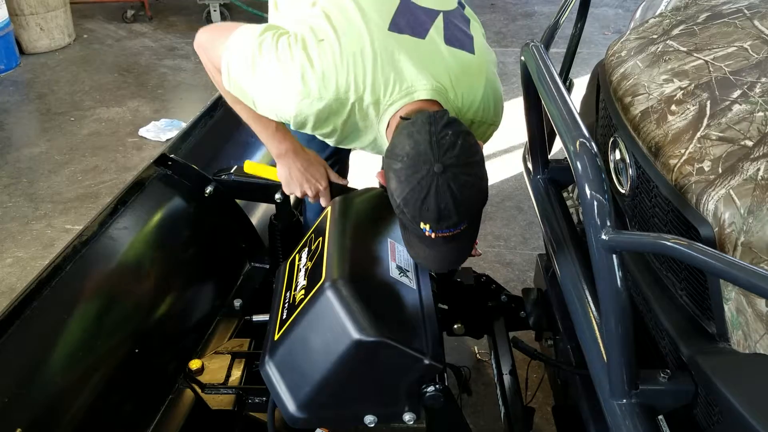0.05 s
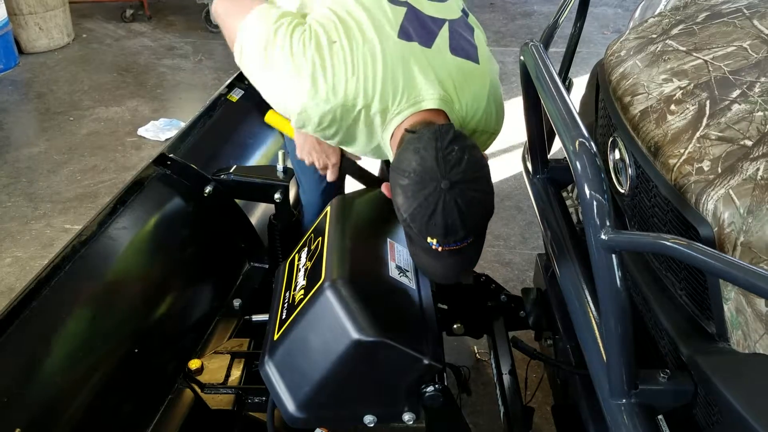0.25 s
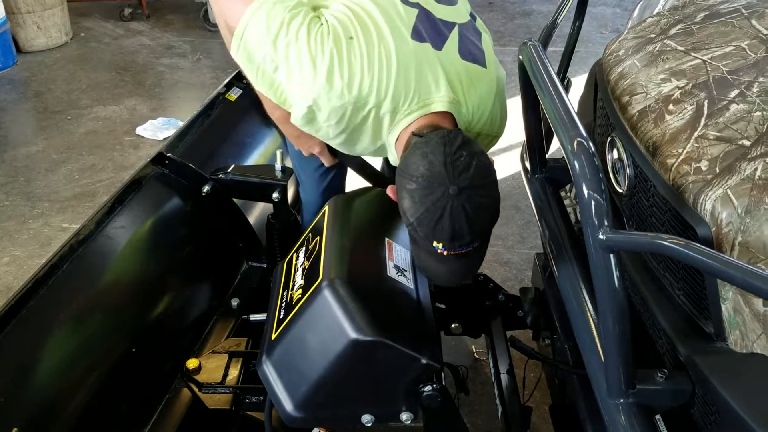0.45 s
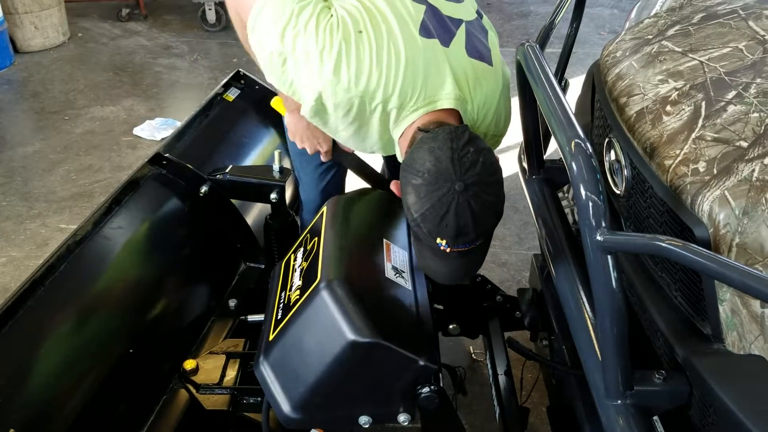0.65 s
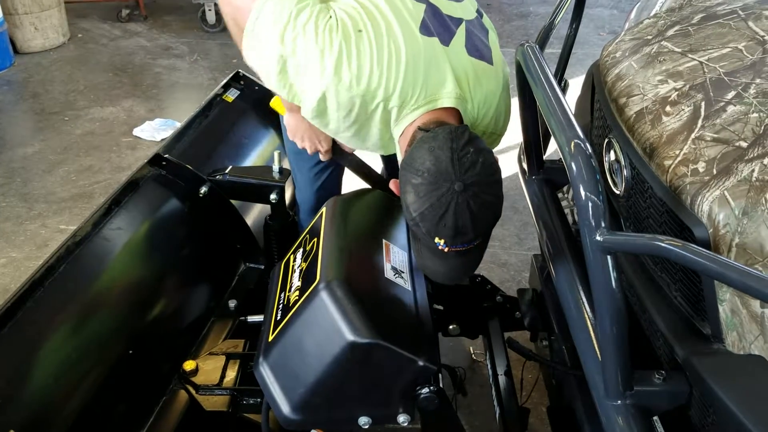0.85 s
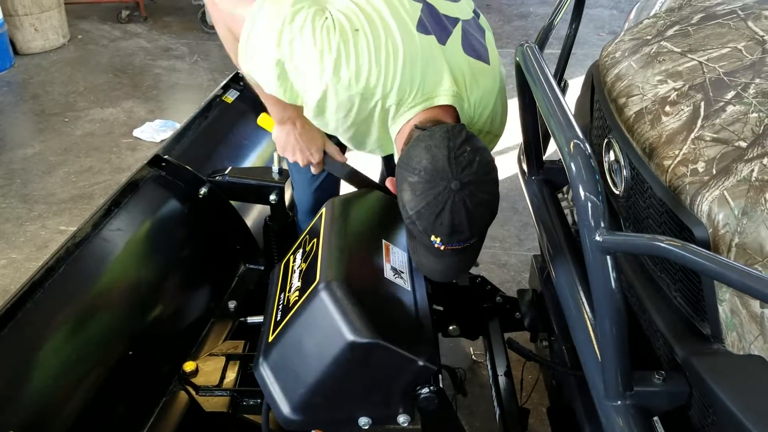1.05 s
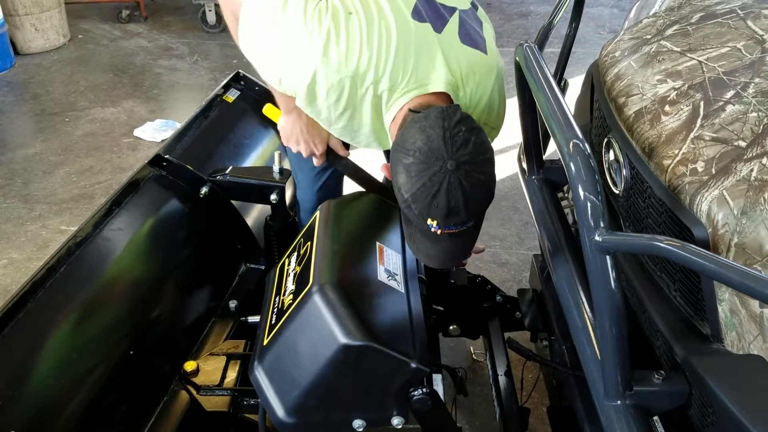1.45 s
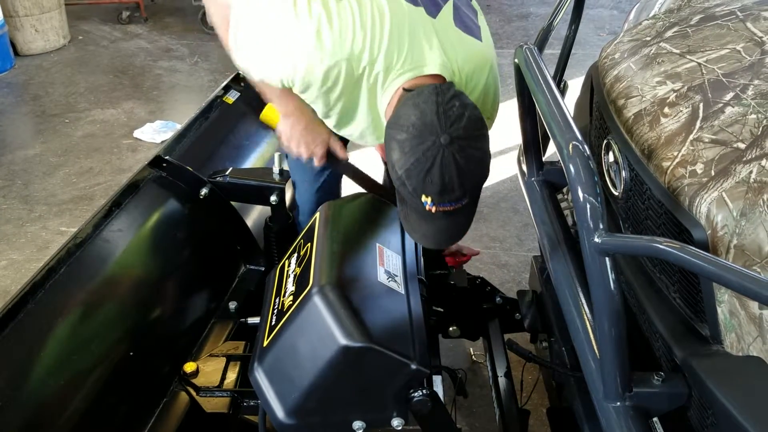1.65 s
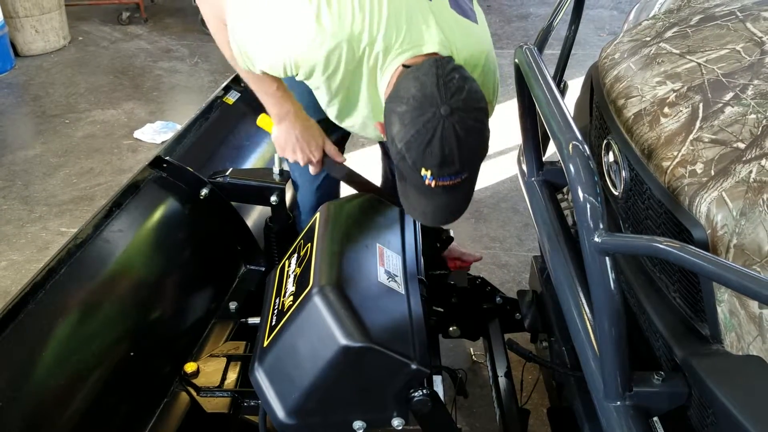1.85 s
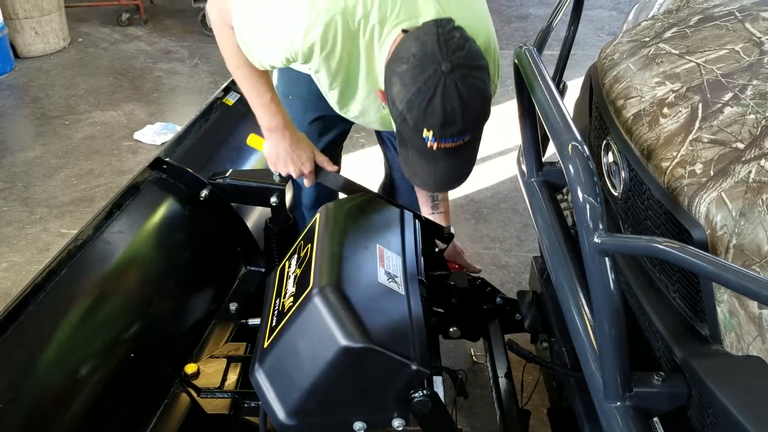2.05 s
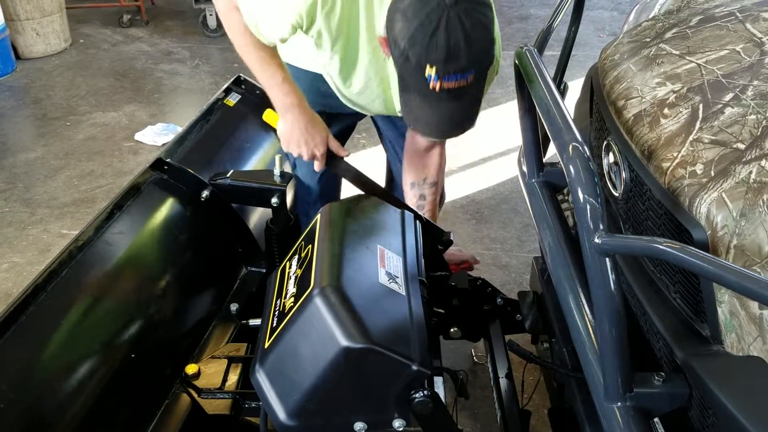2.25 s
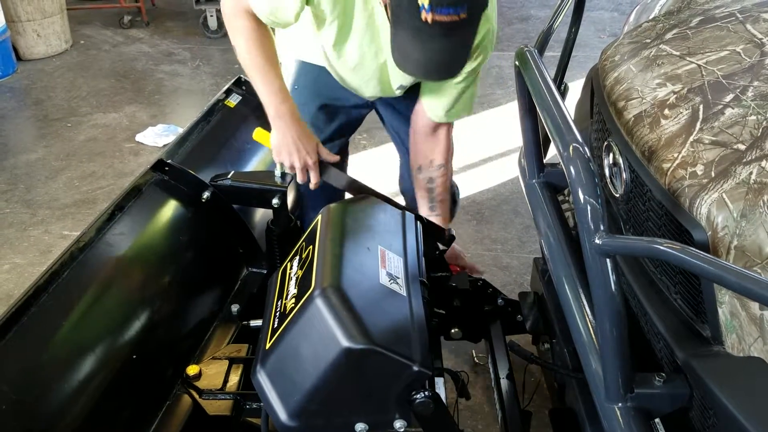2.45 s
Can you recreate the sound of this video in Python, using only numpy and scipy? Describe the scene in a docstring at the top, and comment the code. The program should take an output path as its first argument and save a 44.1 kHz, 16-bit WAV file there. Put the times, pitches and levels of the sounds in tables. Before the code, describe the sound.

Metal clicks, then heavy rattling clunks as a lever seats a plow mount.

```python
"""A faint ring fades, then a steel lever clicks and clanks, seating a utility vehicle's plow mount.
The heavy frame drops into place twice: clunks and a rattle, the second time a low boom.
Each hit cracks and rings the frame, the struck part and small fittings; slipping edges grind.
The concrete-floored workshop adds a tail. Behind it: hiss, a person shifting, one dry slide."""
import sys
import numpy as np
from scipy import signal
from scipy.fft import rfft, irfft
from scipy.io import wavfile

SR = 44100
rng = np.random.default_rng(int(sys.argv[2]) if len(sys.argv) > 2 else 0)


def transcribe(u):
    """Save the signal u as a 16-bit wav file named by the first command-line argument.

    u: samples, shape (n,) or (channels, n), limited to [-1, 1]; the rate is SR.
    q: integer samples, one column per channel.
    """
    v = np.clip(np.atleast_2d(u).T, -1, 1)
    q = np.round(v * 32767).astype(np.int16)
    wavfile.write(sys.argv[1], SR, q)


N = 110250

# hiss and rumble spectrum: f/Hz, third-octave level/dB
HISS_SPECTRUM = [(25, -84), (50, -103), (80, -57.5), (125, -75), (190, -50), (300, -62.5), (500, -57),
                 (800, -59), (1400, -63), (2200, -60), (3200, -55.5), (4300, -49), (6300, -46.5),
                 (8000, -62), (10000, -68.5), (12700, -61), (16000, -64)]
# hiss creeping up: t/s, gain/dB
HISS_ENVELOPE = [(0, -1), (.8, 1.5), (1.7, 2), (2.5, 2.7)]
# person shifting against the lever: t/s, level/dB
SHUFFLE_ENVELOPE = [(0, -52.5), (.25, -43.5), (.5, -43.5), (.72, -46), (.85, -46), (1.3, -38.5),
                    (1.42, -58), (1.55, -43.5), (2.5, -53)]
# shuffle spectrum: f/Hz, third-octave gain/dB
SHUFFLE_SPECTRUM = [(25, -49), (70, -15.5), (140, -8), (300, -3.5), (800, -29), (3000, -42)]
# dry slide before the second drop: t/s, gain/dB
SLIDE_ENVELOPE = [(1.49, -32), (1.545, 4.5), (1.575, 0), (1.61, 4.5), (1.65, -24), (1.72, -40)]
# slide spectrum: f/Hz, third-octave level/dB
SLIDE_SPECTRUM = [(200, -72), (1500, -48.5), (4000, -56.5), (8000, -48), (10000, -57.5), (13000, -55),
                  (16000, -47)]
# background stereo: f/Hz, L-R correlation
BACKGROUND_CORRELATION = [(100, .95), (400, .8), (1000, .3), (4000, 0), (12000, 0)]

# workshop tail: f/Hz, gain/dB
ROOM_GAIN = [(80, -17), (200, -49), (400, -9.5), (900, -15), (2100, -12), (4300, -14), (13000, 1.5)]
# workshop decay: f/Hz, t60/s
ROOM_DECAY = [(80, 0.37), (250, 1), (900, 0.74), (2100, 0.5), (4300, 0.4), (13000, 0.13)]
# ring fading at the start: f/Hz, third-octave level/dB
OPENING_SPECTRUM = [(80, -78), (200, -49), (900, -50), (2100, -50), (4300, -60), (13000, -88)]

# steel on steel: t/s, part, level/dB in each of five registers, ring length factor, extra contact/s
HITS = [ (0.14, "lever", -50, -36.5, -40.5, -50, -60, 2, .001),
        (0.211, "handle", -70, -28, -37.5, -35.5, -36, 1.6, .0005),
        (0.267, "handle", -46, -29.5, -33.5, -30.5, -33, 0.89, 0.0027),
        (0.320, "lever", -42, -32, -38, -40.5, -59, 1.3, 0.0022),
        (0.357, "linkage", -31.5, -29, -28.5, -25, -26, 1.22, 0.0017),
        (0.411, "lever", -50, -36, -35, -51, -47, 1.1, 0.0022),
        (0.59, "lever", -34, -26.5, -35.5, -49, -45, 1.1, 0.0017),
        (0.600, "pawl", -56, -54, -32, -36, -47.5, 0.75, 0.00087),
        (0.614, "frame", -42, -31.5, -31, -49, -42, 0.85, 0.0014),
        (0.708, "lever", -46, -29, -34.5, -45, -47, 0.72, 0.00087),
        (0.735, "lever", -37, -42, -32.5, -47, -42.5, 0.48, 0.00091),
        (0.784, "pawl", -42, -38, -30, -23, -34.5, 0.68, .0001),
        (0.845, "frame", -54, -29.5, -33, -31, -51, 1.3, .003),
        (0.873, "frame", -38, -30.5, -24, -25, -51, 1.1, 0.0047),
        (0.889, "lever", -32, -22, -28, -18, -22.5, 0.85, 0.00026),
        (0.911, "lever", -37, -23.5, -19.5, -33, -40, 1, .002),
        (1.020, "frame", -45, -23, -26, -25, -38, 0.65, 0.0035),
        (1.064, "frame", -59, -20.5, -32, -15.5, -35, 1.8, .012),
        (1.072, "lever", -58, -34, -36, -17, -35, 0.61, .005),
        (1.081, "mount", -23, -23.5, -23.5, -13.5, -19, 1.1, 0.0022),
        (1.103, "blade", -35, -16, -29, -16.5, -30, 2.5, 0.0026),
        (1.145, "blade", -34, -16, -18, -14, -20.5, 0.7, 0.0018),
        (1.164, "frame", -26.5, -18.5, -38, -25, -30.5, 1.65, .003),
        (1.213, "mount", -51, -26.5, -22, -21.5, -31, 1.8, 0.00094),
        (1.256, "frame", -40, -41, -39, -23.5, -40, 1.3, 0.0047),
        (1.319, "mount", -29.5, -25.5, -29.5, -29.5, -36.5, 1, 0.0017),
        (1.351, "mount", -52, -24, -35, -36.5, -50, 2.1, 0.007),
        (1.430, "mount", -33, -47, -32, -34, -48, 1.5, 0.021),
        (1.574, "frame", -57, -34, -35, -24.5, -32.5, 0.35, 0.00019),
        (1.616, "frame", -52, -27.5, -22.5, -15, -49, 0.41, 0.0043),
        (1.621, "latch", -59, -17.5, -25, -18.5, -27.5, 1.4, 0.00083),
        (1.669, "frame", -42, -22.5, -25.5, -16, -38, 1.8, 0.0063),
        (1.695, "catch", -36, -23, -22, -13, -22.5, 0.52, 0.00072),
        (1.706, "frame", -26.5, -16.5, -23.5, -34, -25, 0.96, 0.00087),
        (1.743, "frame", -61, -22, -24.5, -34, -34.5, 1.1, 0.0029),
        (2.175, "frame", -53, -29, -37, -49, -58, 0.7, 0.0034),
        (2.191, "pin", -45, -26.5, -33.5, -32, -47, 1.24, 0.0025)]
# register centres (thud, body, clang, clack, tick): f/Hz
REGISTERS_HZ = [110, 350, 950, 2100, 4300]
# frame's dense ring: f/Hz, third-octave gain/dB
RING_SPECTRUM = [(30, -39), (60, -21), (120, -6), (200, -2), (300, -5), (400, -5), (600, -6.5), (950, -4),
                 (1500, -5), (2300, -4.5), (2900, -7), (4200, -2), (6000, -14), (8000, -18), (10000, -42),
                 (12700, -21.5), (16000, -32)]
# ring decay: f/Hz, t60/s
RING_DECAY = [(80, 0.19), (300, 0.23), (900, 0.26), (2100, 0.1), (4300, .12), (13000, 0.073)]
# ring build-up: f/Hz, rise/s
RING_RISE = [(80, 0.0021), (300, 0.0071), (900, 0.0032), (2100, 0.0011), (13000, 0.0019)]
# ring stereo: f/Hz, L-R correlation
RING_CORRELATION = [(100, .97), (250, .93), (500, .84), (1000, .45), (2000, .4), (4000, .12), (12000, .05)]
# ring balance: f/Hz, L-R level/dB
RING_BALANCE = [(100, -1.5), (250, -2), (500, -0.3), (1000, -3), (2000, -2), (4000, -1), (12000, -0.5)]
# clear modes of blade and frame: f/Hz
FRAME_HZ = [172, 203, 213, 240, 270, 319, 352, 388, 414, 446, 512, 548, 676, 752, 799, 849, 920, 1030]
# per frame mode: gain/dB
FRAME_DB = [-9, -8, -9.5, -16, -9, -15, -23.5, -13.5, -13, -21.5, -11.5, -21, -15, -14, -16, -10, -20,
            -22.5]
# per frame mode: t60/s
FRAME_T60_S = [0.92, 0.52, 1, 1, 0.26, 0.27, 0.42, 0.68, 0.29, 0.34, 0.25, 0.6, 0.26, 0.49, 0.85, 0.16,
               0.21, 0.61]
# each part's own modes: f/Hz
PART_HZ = { "handle": [810, 1395, 2180, 2788, 4170], "linkage": [915, 2083, 2585, 3962, 5141], "lever":
           [2094, 2530, 3305, 4414, 8315, 11950], "pawl": [750, 2083, 2236, 2466, 3114, 4196], "mount":
           [1679, 1819, 1846, 2030, 2064, 2185, 2347, 3230, 3614, 4512, 12100], "blade": [416, 920, 1491,
           1631, 2444, 3703, 4850], "latch": [1410, 1566, 2133, 2266, 2497, 3384, 3499, 3854], "catch":
           [845, 1590, 2018, 2142, 2410, 3811, 4610, 8333, 9235], "pin": [797, 1187, 1564, 2204]}
# per part mode: gain/dB
PART_DB = { "handle": [1.5, -5, -9, -14, -6.5], "linkage": [-6.5, -5, -3.5, -12, -9], "lever": [-4, -1,
           -6.5, -10, -24, -19], "pawl": [2, -15, -3.5, -3, -2, -0.5], "mount": [-1, -8.5, -15, -11, -13.5,
           -4, -2, -16, -12, -5, -26], "blade": [0, -2.5, -22, -9, -9, -7, -5], "latch": [2, -3.5, -3, -3,
           -9, -2, -9.5, 0], "catch": [-2, -10.5, -6, -6, -9, 2, -6, -17, -24], "pin": [-5.5, -11, 5.5, -1]}
# per part mode: t60/s
PART_T60_S = { "handle": [.35, 0.15, .2, 0.39, 0.35], "linkage": [0.24, 0.13, 0.14, 0.076, 0.097], "lever":
              [0.08, 0.06, .09, 0.087, 0.27, 0.1], "pawl": [0.12, .1, 0.11, 0.081, 0.062, 0.24], "mount":
              [0.041, 0.35, 0.34, 0.42, 0.31, 0.062, .05, 0.54, .15, 0.084, .15], "blade": [0.23, 0.24, .15,
              .15, 0.21, 0.14, 0.083], "latch": [0.19, 0.13, 0.13, 0.18, .22, .22, 0.23, 0.044], "catch":
              [0.37, 0.24, 0.098, 0.15, .16, 0.061, 0.084, 0.21, .12], "pin": [.4, .25, 0.061, 0.11]}
# mode stereo: f/Hz, half the L-R phase gap/rad
MODE_SPREAD = [(170, .12), (400, .24), (900, .55), (2100, .63), (8000, .75)]
# edges slipping: t/s, length/s, level/dB
GRINDS = [(0.206, 0.034, -42), (0.891, .014, -45), (1.073, 0.031, -39), (1.537, 0.065, -47.5),
          (1.685, 0.016, -36)]

TIME = np.arange(N) / SR
LN_60DB = np.log(1000)


def from_db(db):
    """Decibels to gain."""
    return 10 ** (np.asarray(db) / 20)


def at_hz(table, hz):
    """Read a table on a log-frequency axis."""
    freqs, values = np.transpose(table)
    return np.interp(np.log(hz), np.log(freqs), values)


def unit_rms(x):
    """Scale to rms 1."""
    return x / np.sqrt(np.mean(x ** 2) + 1e-20)


def butter(x, hz, kind="band", order=2):
    """Butterworth filter."""
    return signal.sosfilt(signal.butter(order, hz, kind, fs=SR, output="sos"), x)


def pan(db):
    """Channel gains for an L-R level difference."""
    return from_db(np.array([[db], [-db]]) / 2)


def stereo(pair, correlation):
    """Mix two independent noises to a given L-R correlation."""
    c = np.clip(correlation, -.99, .99)
    return np.sqrt((1 + c) / 2) * pair[0] + np.sqrt((1 - c) / 2) * pair[1] * np.array([[1], [-1]])


def third_octaves():
    """Yield centre/Hz and two independent unit-rms noises per band."""
    white = rng.standard_normal((2, 2, N + 8000))
    for k, hz in enumerate(1000 * 2 ** (np.arange(-15, 13) / 3)):
        band = butter(white[k % 2], [hz / 2 ** (1 / 6), hz * 2 ** (1 / 6)], order=3)
        yield hz, unit_rms(band[:, -N:])


def hit_gains(hz):
    """How hard each hit drives the steel at this frequency."""
    return from_db([np.interp(np.log(hz), np.log(REGISTERS_HZ), hit[2:7]) for hit in HITS])


def hit_energy(hz, t60_s, rise_s):
    """Energy envelope: each hit's share builds up, then decays."""
    impulses = np.zeros(N)
    impulses[[int(hit[0] * SR) for hit in HITS]] = hit_gains(hz) ** 2
    fall, rise = np.exp(-2 * LN_60DB / (t60_s * SR)), np.exp(-1 / (rise_s * SR))
    decaying = signal.lfilter([1], [1, -fall], impulses + 1e-18)
    return signal.lfilter([1 - rise], [1, -rise], decaying)


def background():
    """Steady hiss, the low shuffle of a moving body, one dry slide."""
    envelopes = HISS_ENVELOPE, SHUFFLE_ENVELOPE, SLIDE_ENVELOPE
    spectra = HISS_SPECTRUM, SHUFFLE_SPECTRUM, SLIDE_SPECTRUM
    gains = [from_db(np.interp(TIME, *np.transpose(envelope))) for envelope in envelopes]
    out = 0
    for hz, pair in third_octaves():
        power = sum((gain * from_db(at_hz(spectrum, hz))) ** 2 for gain, spectrum in zip(gains, spectra))
        out += np.sqrt(power) * stereo(pair, at_hz(BACKGROUND_CORRELATION, hz))
    return out * pan(db=-0.5)


def room_energy(hz):
    """The workshop holds each hit as a tail in this band."""
    return hit_energy(hz, at_hz(ROOM_DECAY, hz), rise_s=0.027) * from_db(at_hz(ROOM_GAIN, hz)) ** 2


def grit(snaps_per_s=7500, spread_db=3, band_hz=(2300, 17300)):
    """Grinding edges shed a spray of tiny bright snaps."""
    envelope = 0
    for start_s, length_s, db in GRINDS:
        arch = np.sin(np.pi * np.clip((TIME - start_s) / length_s, 0, 1))
        envelope += from_db(db) * np.sqrt(arch.clip(0))
    sizes = from_db(spread_db * np.minimum(rng.exponential(1, (2, N)), 4))
    signs = rng.choice([-1, 1], (2, N))
    snaps = sizes * signs * (rng.random((2, N)) < snaps_per_s / SR)
    return envelope * unit_rms(butter(snaps + 1e-18, band_hz))


def boom(start_s=1.722, hz=70, db=-23, t60_s=0.2, rise_s=0.011):
    """The whole mount bounces after the second drop."""
    age = np.maximum(TIME - start_s, 0)
    envelope = (1 - np.exp(-age / rise_s)) * np.exp(-LN_60DB * age / t60_s)
    return from_db(db) * envelope * np.sin(2 * np.pi * hz * age)


def cracks(gain_db=12.5, decay_s=0.0038, band_hz=(680, 3700)):
    """First instant of contact: a hard noise burst, scaled by the hit's tick level."""
    energy = hit_energy(REGISTERS_HZ[-1], t60_s=decay_s * LN_60DB, rise_s=decay_s / 10)
    burst = np.sqrt(energy) * stereo(rng.standard_normal((2, N)), correlation=0.83)
    return from_db(gain_db) * butter(burst, band_hz) * pan(db=-2)


def mode(hz, db, t60_s, coupling, boost_db=2.5, scatter_db=2.5):
    """One steel mode, pushed with random strength and phase per hit; longer contact swells slower."""
    scatter, cycles = rng.standard_normal((len(HITS), 2)).T
    sizes = coupling * hit_gains(hz) * from_db(db + boost_db - scatter_db * scatter)
    kicks = sizes * np.exp(2j * np.pi * cycles)
    age = TIME[:2000]
    swing = np.exp(2j * np.pi * hz * age)
    rise_s = at_hz(RING_RISE, hz)
    drive = np.zeros(N + len(age), complex)
    for (start_s, *_, contact_s), kick in zip(HITS, kicks):
        if kick:
            start = int(start_s * SR)
            push = np.exp(-age / (rise_s + contact_s))
            drive[start:start + len(age)] += kick * swing * push / push.sum()
    pole = np.exp((2j * np.pi * hz - LN_60DB / t60_s) / SR)
    ring = signal.lfilter([1], [1, -pole], drive[:N] + 1e-18)
    turn = np.exp(1j * at_hz(MODE_SPREAD, hz) * rng.choice([-1, 1]))
    return np.real([ring * turn, ring * turn.conj()]) * pan(at_hz(RING_BALANCE, hz))


def fittings(count=16, range_hz=(4300, 14050), gain_db=-5.5, t60_s=0.13, share=0.5):
    """Bolts and brackets ring at unrelated high pitches; each hit shakes a random share."""
    pitches_hz = np.geomspace(*range_hz, count) * rng.uniform(.97, 1.03, count)
    shaken = rng.random((len(HITS), count)) < share
    return sum(mode(hz, gain_db + at_hz(RING_SPECTRUM, hz), t60_s, struck)
               for hz, struck in zip(pitches_hz, shaken.T))


def clear_modes():
    """The frame rings at every hit, each part only when struck itself."""
    out = sum(mode(*row, coupling=0.87) for row in zip(FRAME_HZ, FRAME_DB, FRAME_T60_S))
    for part in PART_HZ:
        struck = np.array([hit[1] == part for hit in HITS])
        out += sum(mode(*row, struck) for row in zip(PART_HZ[part], PART_DB[part], PART_T60_S[part]))
    return out


def chatter(depth_db=0.5, rate_hz=110):
    """Quick uneven gain of parts rattling against each other."""
    knots = np.clip(rng.standard_normal(4000), -2, 1)
    return from_db(depth_db * np.interp(TIME * rate_hz, np.arange(len(knots)), knots))


def frame_energy(hz):
    """The frame's close modes in this band swell during contact, then ring down."""
    t60_s, rise_s = at_hz(RING_DECAY, hz), at_hz(RING_RISE, hz)
    energy = np.zeros(N)
    for (start_s, *_, stretch, contact_s), gain in zip(HITS, hit_gains(hz)):
        start, ring_s = int(start_s * SR), t60_s * stretch
        age = TIME[:min(N - start, int(ring_s * SR))]
        swell = 1 - np.exp(-age / (rise_s + contact_s))
        energy[start:start + len(age)] += gain ** 2 * swell * np.exp(-2 * LN_60DB * age / ring_s)
    return energy


def dense_ring(opening_t60_s=0.43):
    """Countless frame modes as band noise, with the room tail and the faint opening ring."""
    out, rattle = 0, chatter()
    for hz, pair in third_octaves():
        energy = frame_energy(hz) * rattle ** 2 + room_energy(hz)
        opening = from_db(at_hz(OPENING_SPECTRUM, hz)) * np.exp(-LN_60DB * TIME / opening_t60_s)
        envelope = np.sqrt(energy * from_db(at_hz(RING_SPECTRUM, hz)) ** 2 + opening ** 2)
        out += envelope * stereo(pair, at_hz(RING_CORRELATION, hz)) * pan(at_hz(RING_BALANCE, hz))
    return out


def scene(low_cut_hz=50, left_lag_s=25e-6):
    """Struck steel, reaching the left side slightly later, over the background."""
    steel = dense_ring() + clear_modes() + fittings() + cracks() + grit() + boom()
    left, right = butter(steel, low_cut_hz, "high")
    delay = np.exp(-2j * np.pi * np.fft.rfftfreq(N, 1 / SR) * left_lag_s)
    left = irfft(rfft(left) * delay, N)
    return np.array([left, right]) + background()


def record(dry):
    """Soft clip, then a steep low-pass."""
    cutoff_hz = 15850
    rounded = 1.172 * np.tanh(dry / 1.226)
    return signal.sosfilt(signal.ellip(12, .1, 80, cutoff_hz, fs=SR, output="sos"), rounded)


dry = scene()
out = record(dry)
transcribe(out)
```